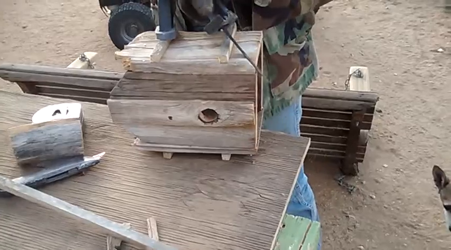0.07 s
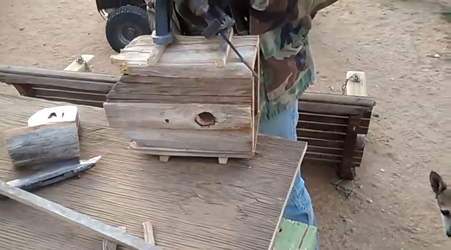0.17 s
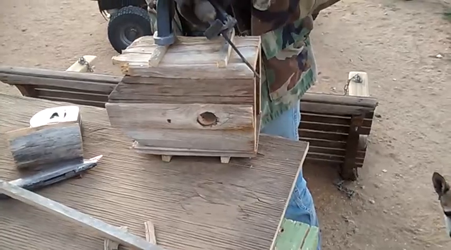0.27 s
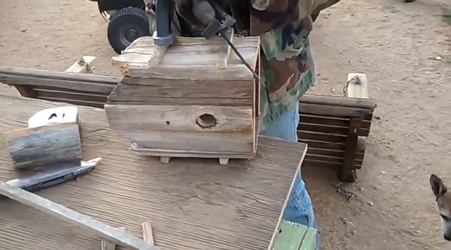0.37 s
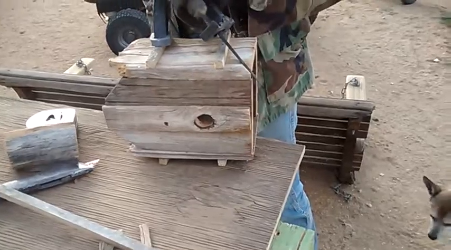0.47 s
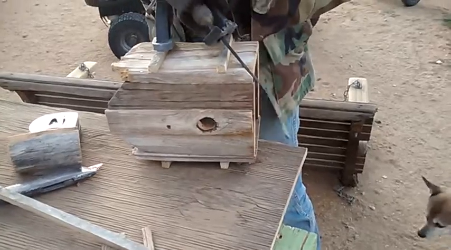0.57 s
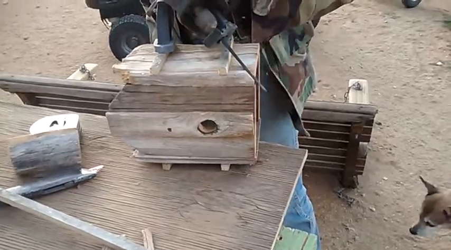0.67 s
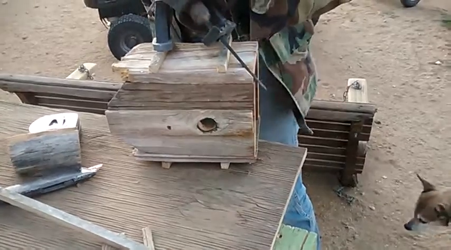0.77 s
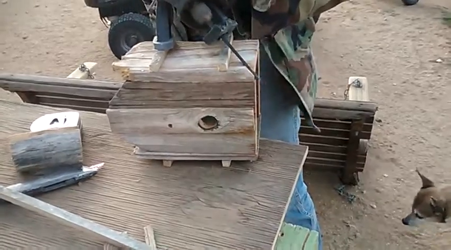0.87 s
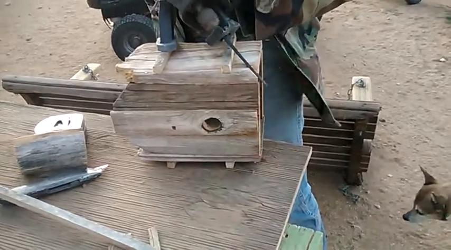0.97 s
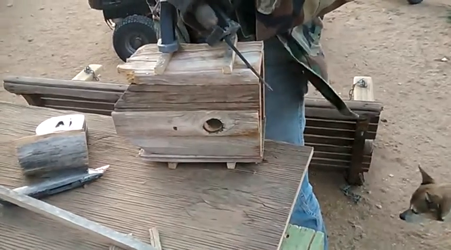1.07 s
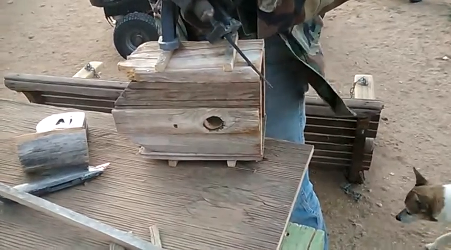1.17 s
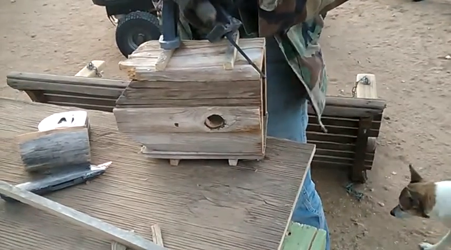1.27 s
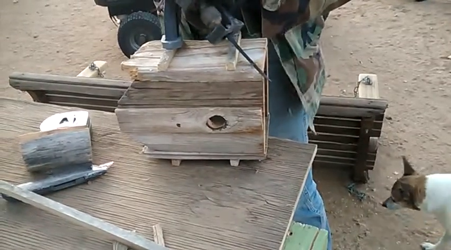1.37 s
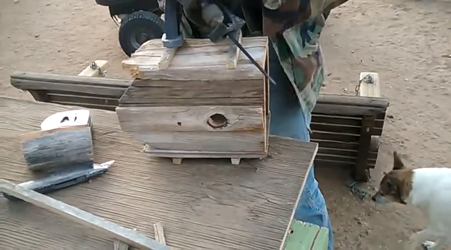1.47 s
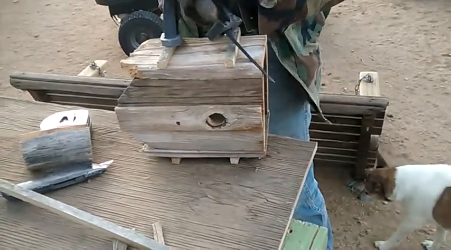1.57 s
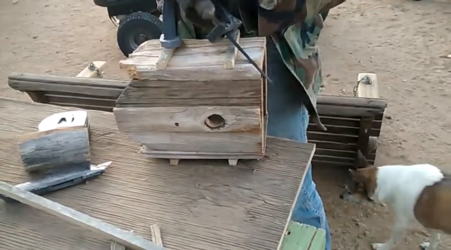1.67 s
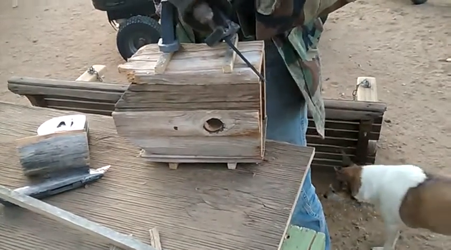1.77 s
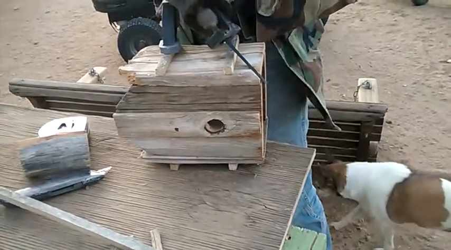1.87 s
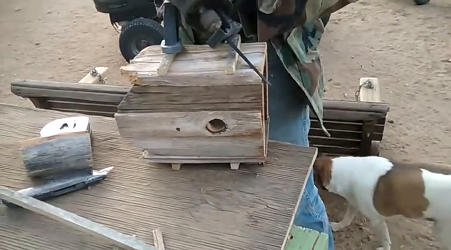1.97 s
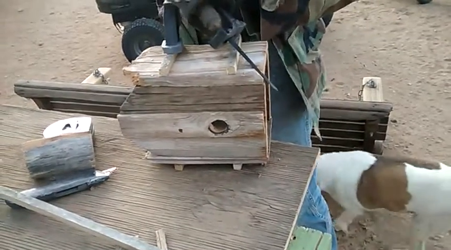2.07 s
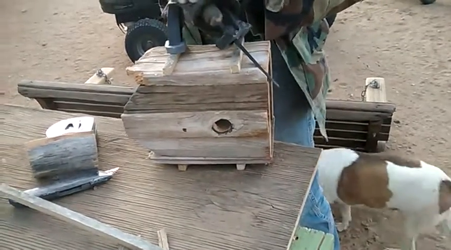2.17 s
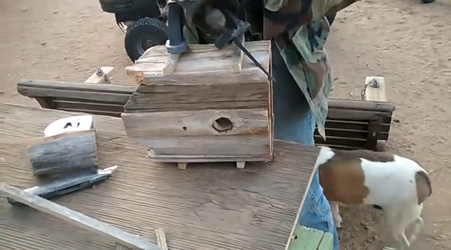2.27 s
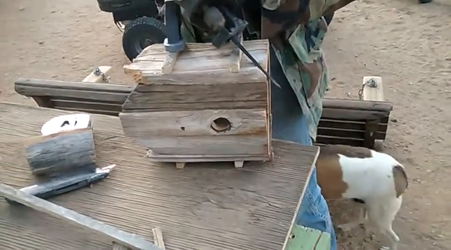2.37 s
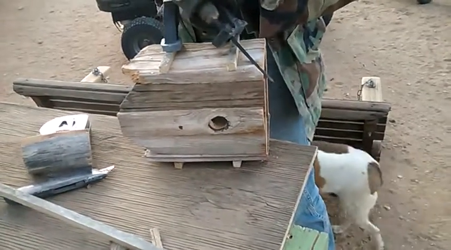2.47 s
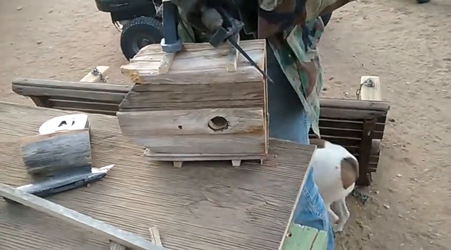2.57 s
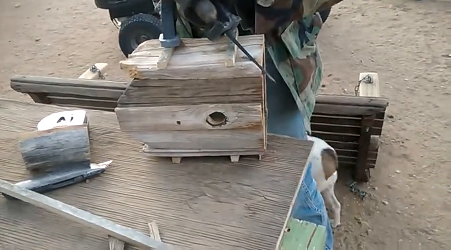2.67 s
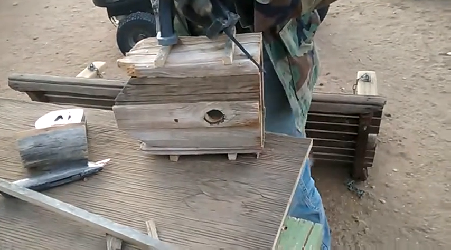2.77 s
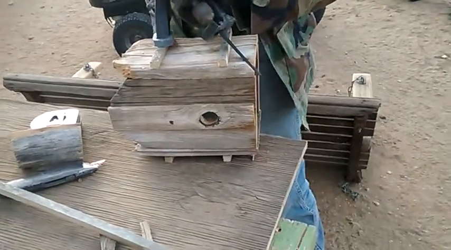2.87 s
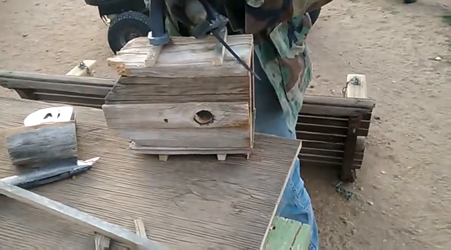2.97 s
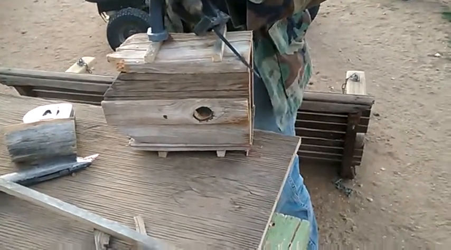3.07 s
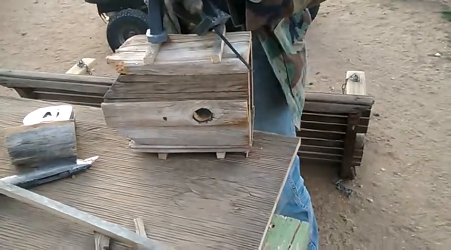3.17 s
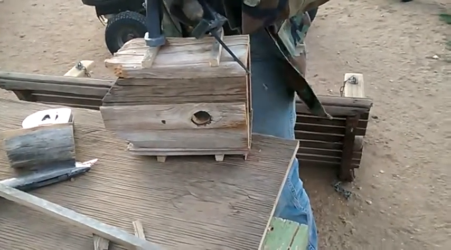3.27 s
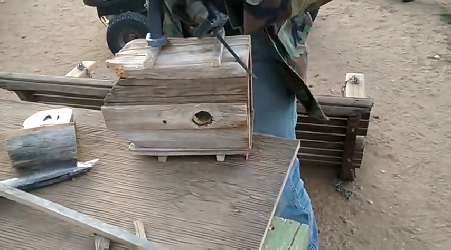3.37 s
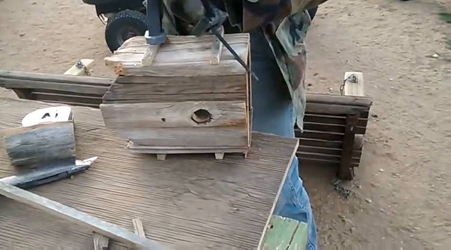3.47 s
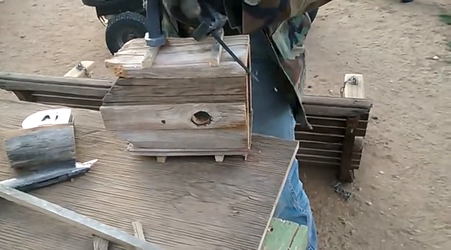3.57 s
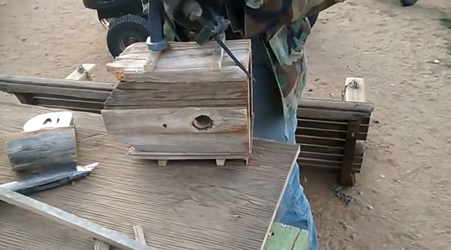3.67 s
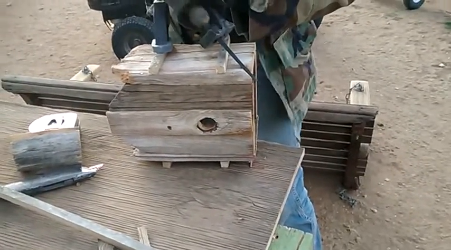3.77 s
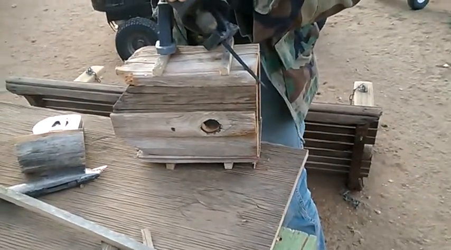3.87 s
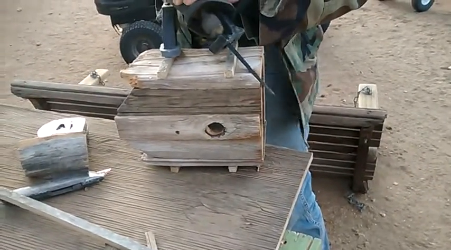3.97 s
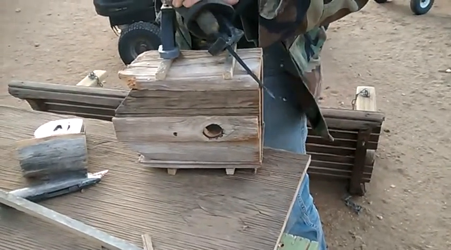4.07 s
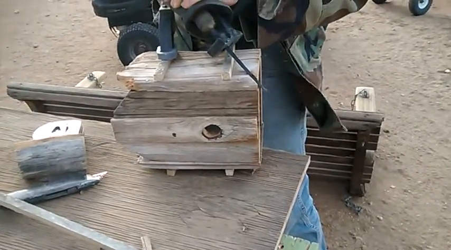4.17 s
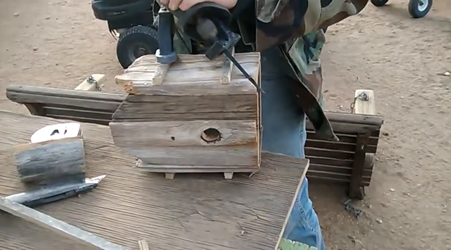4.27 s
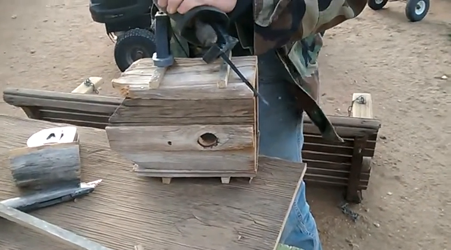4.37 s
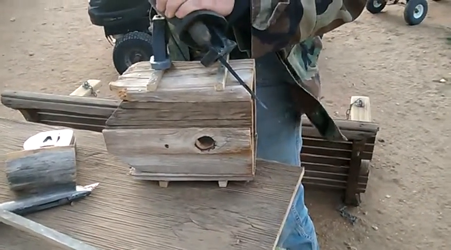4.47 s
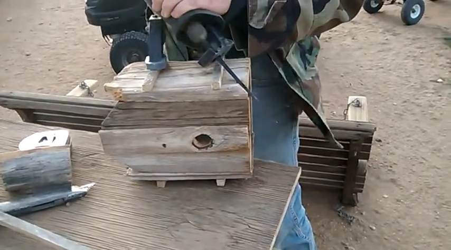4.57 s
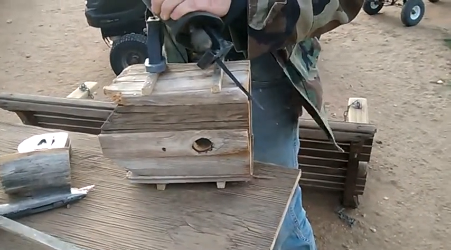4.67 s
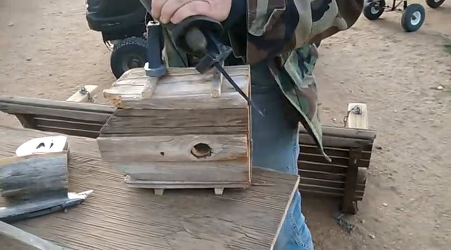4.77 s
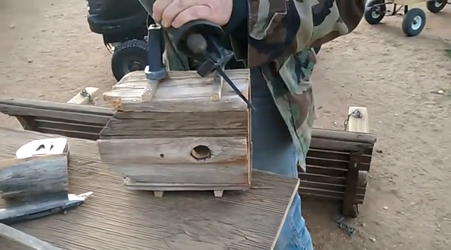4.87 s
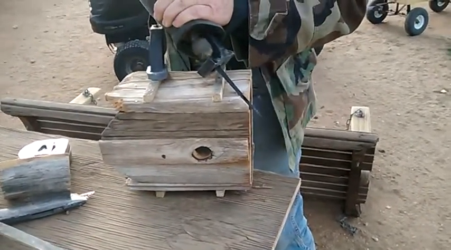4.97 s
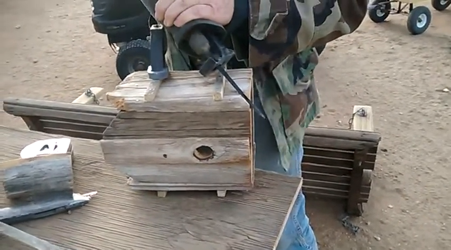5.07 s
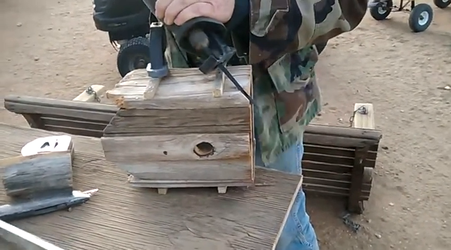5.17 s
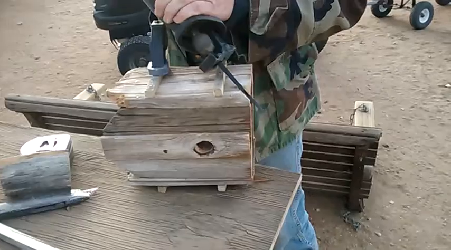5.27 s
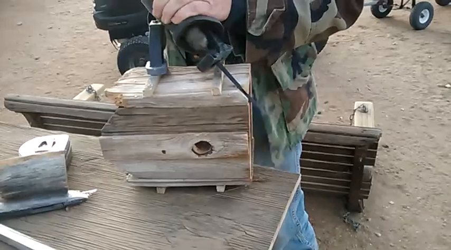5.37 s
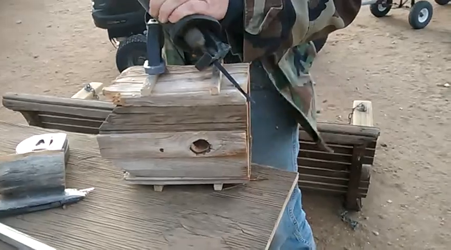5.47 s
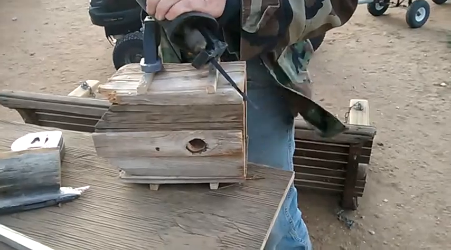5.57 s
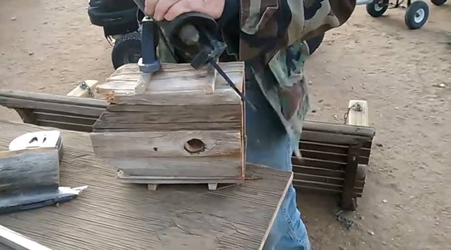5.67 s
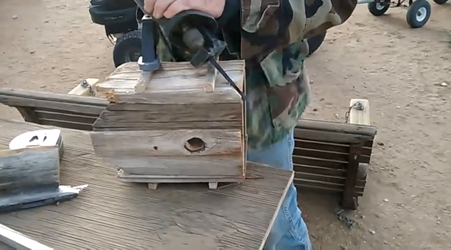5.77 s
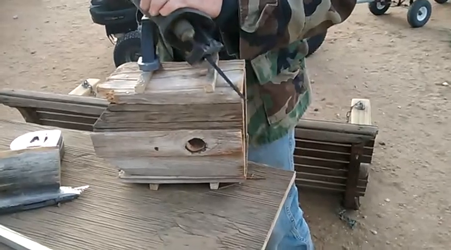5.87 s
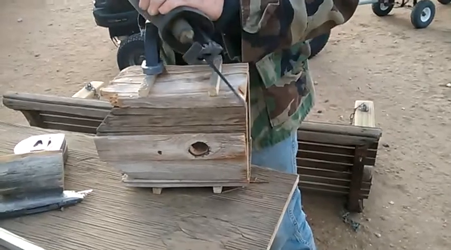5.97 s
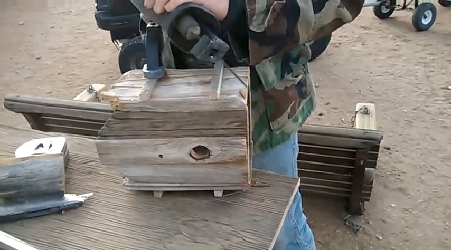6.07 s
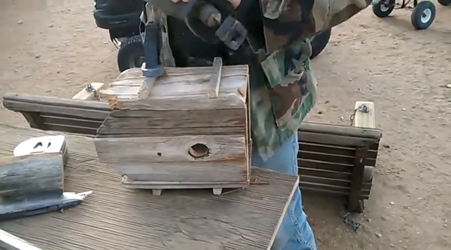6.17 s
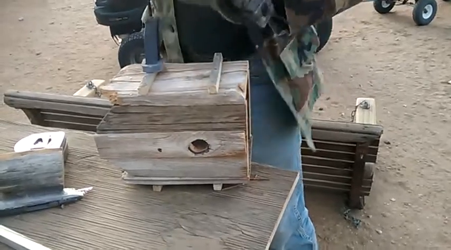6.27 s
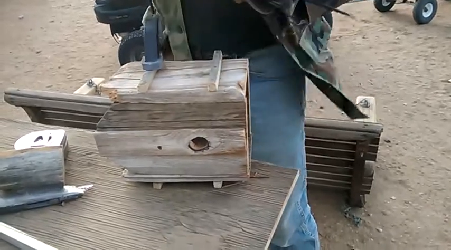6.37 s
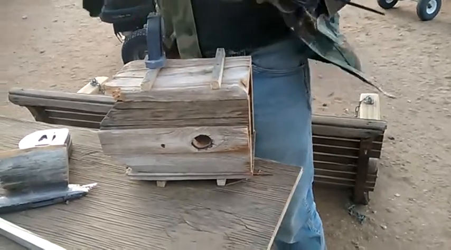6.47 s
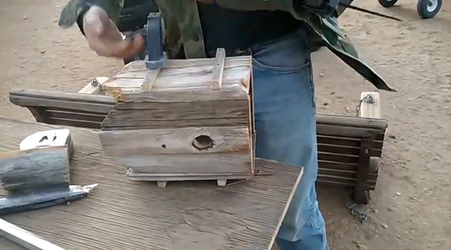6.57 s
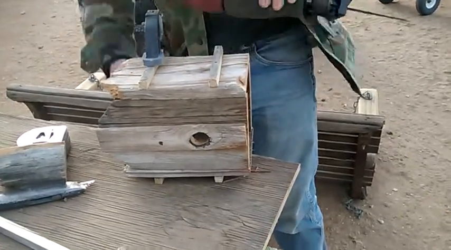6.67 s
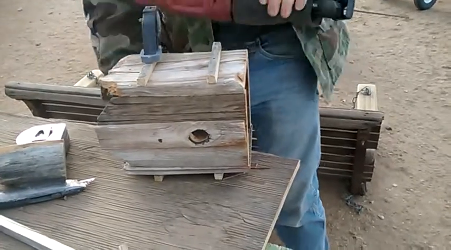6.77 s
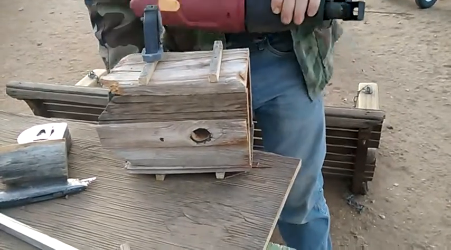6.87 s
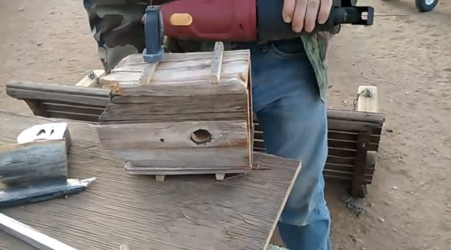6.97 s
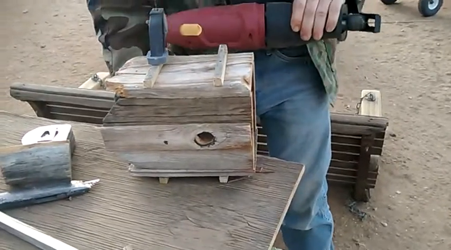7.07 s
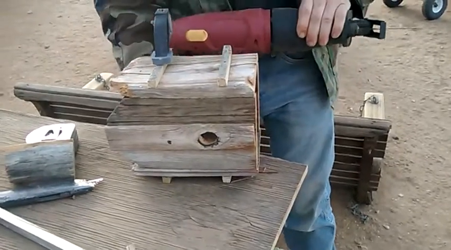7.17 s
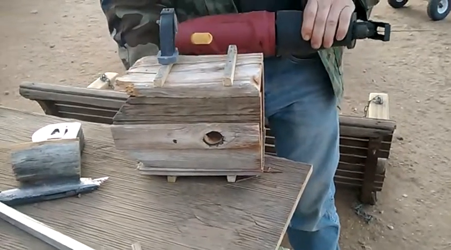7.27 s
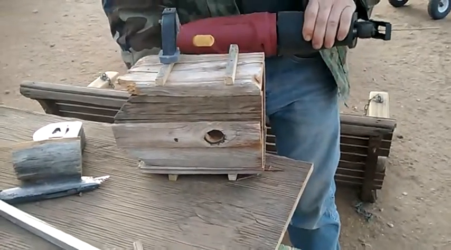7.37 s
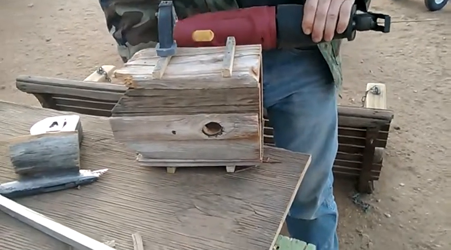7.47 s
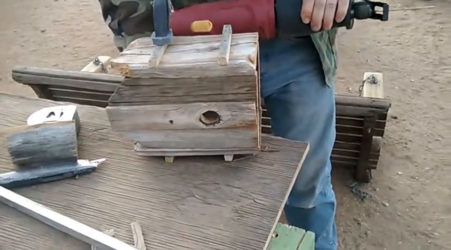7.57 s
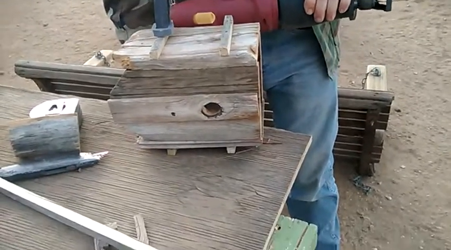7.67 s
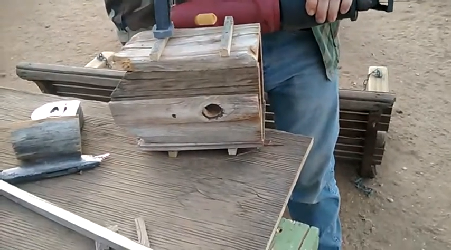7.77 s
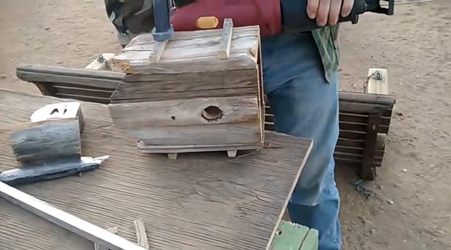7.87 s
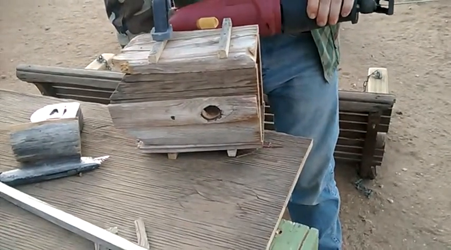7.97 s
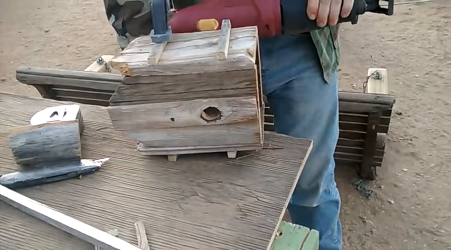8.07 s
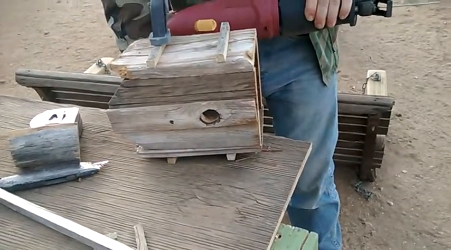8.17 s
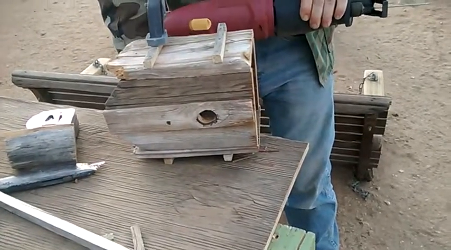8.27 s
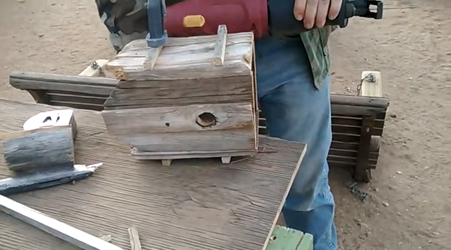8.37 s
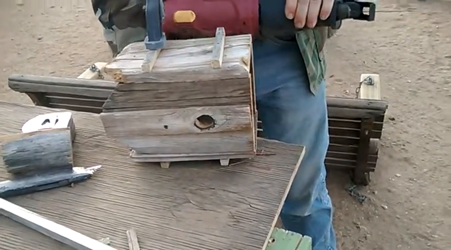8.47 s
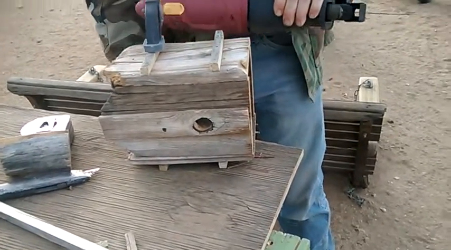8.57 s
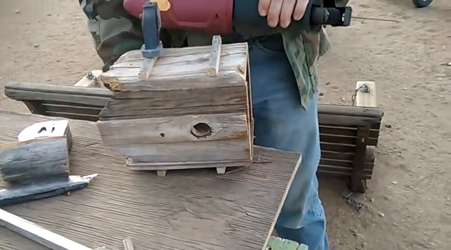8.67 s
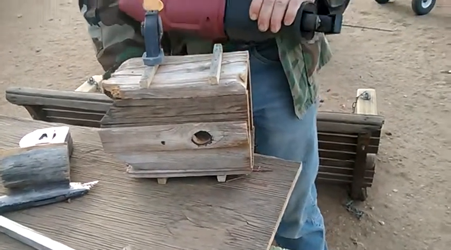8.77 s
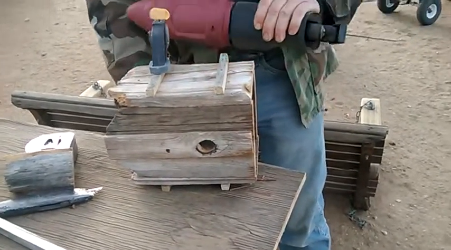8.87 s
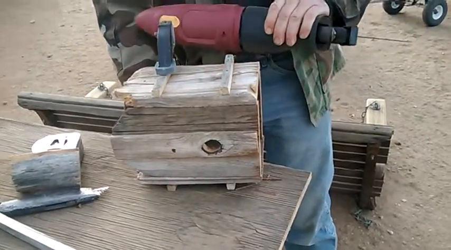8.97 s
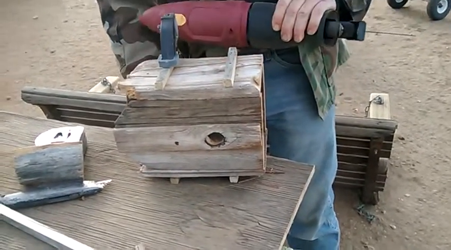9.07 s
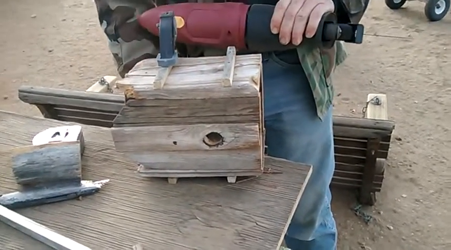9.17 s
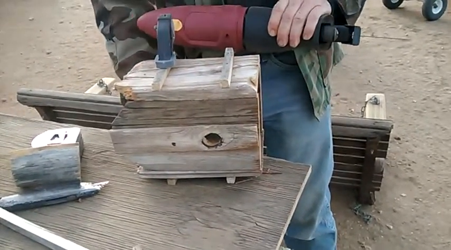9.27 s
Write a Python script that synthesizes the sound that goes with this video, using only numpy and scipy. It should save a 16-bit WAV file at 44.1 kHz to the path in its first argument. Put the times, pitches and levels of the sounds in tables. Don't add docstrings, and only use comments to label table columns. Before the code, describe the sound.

Rapid saw strokes tear old wood with a hollow boom and thin motor whine, then loose gears clatter, slow and fall silent.

```python
import sys
import numpy as np
from scipy import signal
from scipy.fft import rfft, irfft
from scipy.io import wavfile
from scipy.ndimage import uniform_filter1d

SR = 44100
rng = np.random.default_rng(int(sys.argv[2]) if len(sys.argv) > 2 else 0)


def natural_amplitude(level_db):
    exponent = np.asarray(level_db, float) / 20
    return 10 ** exponent


def dump_mix(stems):
    frames = np.atleast_2d(stems).T
    limited = np.clip(frames, -1, 1)
    pcm = np.round(limited * 32767).astype(np.int16)
    wavfile.write(sys.argv[1], SR, pcm)


N = 411012
TIME = np.arange(N) / SR
HZ = np.maximum(np.arange(N // 2 + 1) * SR / N, 1)

# freq_hz, density_db
AIR = [(40, -9), (138, 3), (580, -0.5), (1500, -10), (2700, -20), (4000, -14), (5200, -19.5), (6600, -12.5),
       (15000, -37)]
AIR_DB = -44.5

# time_s, buffeting_db
GUST = [(0.0, -39), (1.0, -30.5), (1.8, -39), (2.35, -24.5), (2.8, -39), (3.4, -42.5), (4.0, -25),
        (4.2, -36), (4.75, -26.5), (5.2, -35.5), (6.0, -30.5), (6.6, -50), (7.0, -44), (7.2, -47),
        (8.2, -62), (8.4, -64), (9.15, -75), (9.32, -42)]
RUMBLE_DB, RUMBLE_FOLLOWS = -43, 0.041
RUMBLE_WANDER_DB = 7.5
# time_s, peak_db, pitch_hz
PUFFS = [(0.782, -8, 237), (0.983, -11, 243), (1.404, -8, 272), (1.477, -5.5, 236), (1.545, -8, 168.6),
         (3.761, -7, 284), (4.558, -9, 216), (5.482, -9, 196.8), (5.633, -14, 304.2), (5.751, -13, 147),
         (6.074, -32, 239), (6.263, -11, 177.5), (6.464, -24, 135), (6.745, -15, 206), (6.771, -6, 187),
         (6.791, -12, 183), (6.845, -11, 185), (6.874, -22, 226), (6.892, -6, 260), (6.911, -7, 217),
         (6.932, -18, 130), (7.019, -10.5, 218.8), (7.042, -16, 200), (7.069, -17, 235),
         (7.421, -21, 159.6), (8.355, -10, 164), (8.398, -18, 176), (8.005, -24, 170), (9.259, -21, 120),
         (9.256, -31, 280), (9.286, -41, 330)]

# freq_hz, phase_rad
LEAD = [(0, 0.12), (1550, 0.23), (1980, -3.2), (3010, -3.1), (3360, -3.9), (3790, -0.5), (4390, -0.3),
        (4910, 2.2), (6890, 5.9), (11100, 15.5), (11700, 15.7), (13300, 19.8), (13900, 22.0), (15000, 22.1)]
# freq_hz, level_db
TILT = [(200, 0.5), (760, 2), (1200, -1), (1850, -12), (2300, -2), (3000, 0.5), (3900, 2.5), (4600, -1),
        (5900, 5.5), (6400, -6), (7300, 4.5), (14800, 3.5)]
# freq_hz, share_0_to_1
SCATTER = [(200, 0.15), (500, 0.0099), (1400, 0.024), (1850, 0.46), (2350, 0.098), (2750, 0.052), (3500, 1),
           (6000, 0.41), (9000, 1), (11400, 0.43), (14000, 0.49)]

# start_s, level_db, pitch_hz
TAPS = [(8.498, -33, 2450), (8.498, -29, 600), (8.525, -29, 1350), (8.527, -38, 3600), (8.548, -35, 1500),
        (8.578, -29, 500), (8.595, -33, 420), (8.62, -42, 750), (8.58, -42, 1400), (8.897, -43, 1900),
        (8.899, -43, 2300), (8.912, -36, 700), (8.93, -38, 260), (8.925, -43, 520), (8.66, -43, 450),
        (9.01, -46, 1600), (9.03, -45, 1600), (9.07, -49, 1620)]
TAP_RING_S, TAP_RING_CYCLES = 0.004, 3
BOUNCE_DB = -18

# time_s, pitch_hz
WHINE = [(0, 8270), (.3, 8210), (.6, 8130), (.9, 8160), (1.25, 8310), (1.58, 8460), (2.05, 8380),
         (2.5, 7990), (3.25, 8370), (3.6, 8430), (3.95, 8410), (4.3, 8250), (4.75, 8070), (5.15, 8130),
         (5.43, 8020), (5.68, 8080), (5.84, 7800)]
WHINE_PER_STROKE = 222
WHINE_DB, WHINE_DB_PER_100_HZ = -30.5, 1
# time_s, strokes_per_s
SLOWING = [(5.93, 32.4), (6.12, 28.8), (6.35, 25.2), (6.6, 21.8), (7.0, 17.5), (7.6, 12.5), (8.6, 4.5)]
# multiple, powered_db, coasting_db, share_in_scattered_path
ROTOR = [(2, -40, -41, 0.97), (3, -60, -35, .9), (4, -34, -36, .9), (5, -49, -49, -.9), (8, -56, -56, -.5),
         (10, -35, -42, -.9), (12, -37, -42, 0.76)]

# time_s, share_out_of_wood_0_to_1, gear_knocks_per_s
COAST = [(5.842, 0.1, 367), (6.35, 0.67, 273), (6.9, 0.97, 134), (7.101, 0.96, 120), (7.501, 0.99, 112),
         (8.2, 1, 144), (8.6, 1, 60)]
# time_s, level_db
COASTING = [(5.8, -23), (6.3, -25.5), (6.75, -23), (6.95, -28.5), (7.65, -27), (8.3, -30.5), (8.5, -35),
            (8.54, -41), (8.6, -62)]
# centre_s, change_db, half_length_s
LULLS = [
    (7.9, -39, 0.01),
    (13, -18, 0.0072),
    (8.1, 4, 0.0076),
    (8.066, -7, 0.009),
    (3.2, -12, 0.0061),
]
# start_s, peak_db
HARD_KNOCKS = [(6.1844, -16), (6.2008, -15), (6.2183, -14), (6.2353, -15), (6.2637, -14), (6.2946, -12),
               (6.3335, -12), (6.3909, -14), (6.4328, -12), (6.4543, -14), (6.4642, -12), (6.4797, -10),
               (6.5076, -10), (6.5166, -11), (6.549, -11), (6.584, -5), (6.6094, -4), (6.6378, -10),
               (6.6458, -9), (6.6772, -10), (6.7012, -11), (6.7147, -12), (6.7271, -10), (6.7431, -8),
               (6.778, -13), (6.7955, -19), (6.8299, -13), (6.8828, -17), (6.9017, -17), (6.9107, -17),
               (6.9401, -23), (6.9611, -18), (6.9716, -16), (7.02, -23), (7.0728, -18), (7.0983, -19),
               (7.1242, -20), (7.1387, -14), (7.1497, -13), (7.1861, -18), (7.209, -18), (7.2185, -18),
               (7.2484, -21), (7.2579, -19), (7.2829, -11), (7.2923, -12), (7.3248, -20), (7.3353, -18),
               (7.3702, -22), (7.3836, -17), (7.4156, -18), (7.4435, -17), (7.4889, -17), (7.4974, -18),
               (7.5128, -19), (7.5313, -20), (7.5463, -17), (7.5762, -19), (7.5852, -16), (7.6031, -16)]
# start_s, peak_db
LAST_KNOCKS = [(7.6338, -26), (7.6338, -25), (7.6673, -26), (7.6807, -24), (7.6922, -17), (7.7162, -25),
               (7.7286, -27), (7.7396, -26), (7.7466, -26), (7.7531, -24), (7.783, -27), (7.7955, -24),
               (7.8074, -25), (7.8329, -26), (7.8553, -27), (7.8643, -26), (7.8783, -26), (7.9007, -27),
               (7.9197, -25), (7.9337, -23), (7.9656, -28), (7.9756, -26), (8.004, -31), (8.004, -26),
               (8.0155, -26), (8.023, -25), (8.0379, -25), (8.0544, -28), (8.0723, -32), (8.0798, -31),
               (8.0853, -28), (8.1063, -25), (8.1138, -28), (8.1377, -27), (8.1532, -27), (8.1621, -29),
               (8.1726, -29), (8.1871, -29), (8.205, -28), (8.2275, -30), (8.2539, -29), (8.2604, -33),
               (8.2909, -31), (8.2973, -30), (8.3143, -31), (8.3213, -30), (8.3542, -33), (8.3697, -33),
               (8.3782, -32), (8.3971, -37), (8.4086, -33), (8.4196, -31), (8.443, -32), (8.4829, -36)]
HARD_DB, LAST_DB = -9, -9
KNOCK_SPREAD_DB, BUNCHING_DB = 2.2, 0.9
KNOCK_OVER_DB = -5
KNOCK_S, CLEAR_S = 0.0005, 0.0083
STRIKE_DB, GRIT_DB, BETWEEN_DB = 12, -2, -17
# centre_hz, width_hz, level_db
GEARBOX = [(1227, 30, -10), (1405, 45, 9), (1673, 110, 3.5), (3400, 177, -2), (3735, 133, -4.5),
           (4240, 84, -29), (4340, 96, -11.5)]
# freq_hz, density_db
RATTLE = [(700, -6), (1200, -0.5), (2100, -7.5), (2800, -16), (4000, -8), (4700, -20), (5300, -16.5),
          (8000, -32.5), (10000, -23), (11500, -82), (15500, -67)]
# time_s, first_hz, second_hz
GAP = [(6.0, 520, 950), (6.9, 420, 880), (7.6, 470, 980), (8.5, 505, 1085)]
LIFT_S, LIFT_HALF_S, LIFT_DB, LIFT_RING_DB = 6.625, 0.27, 6, -24.5

# time_s, boom_db
FEED = [(0.0, -14.5), (0.16, -19), (0.45, -13.5), (0.7, -14.5), (1.3, -15), (1.53, -17.5), (1.77, -15.5),
        (2.15, -12), (2.4, -13), (2.65, -16), (3.12, -18.5), (3.9, -17.5), (4.18, -12), (4.8, -16),
        (5.05, -13.5), (5.5, -13), (5.95, -19.5), (6.15, -44)]
# centre_s, jump_db, half_length_s
BINDS = [
    (0.01, 11, 0.15),
    (0.229, 14.5, 0.089),
    (0.385, 13.5, 0.065),
    (2.005, 4, 0.051),
    (2.483, 3, 0.05),
    (4.623, 11, 0.1),
    (5.238, 12, 0.14),
]
BIND_IN_BOOM, BIND_IN_HOUSING = 0.25, 0.15
# time_s, level_db
TEETH = [(0.0, -27), (0.17, -26), (0.46, -29), (1.31, -25), (1.59, -28), (2.0, -25), (2.19, -30),
         (3.09, -24.5), (3.73, -25), (3.76, -29.5), (4.3, -27), (5.5, -28), (5.71, -24.5), (5.77, -28.5),
         (6.73, -26.5), (6.9, -26)]
HISS_DB, HOUSING_DB = 5.5, -18.5
HOUSING_FOLLOWS_TEETH, HOUSING_FOLLOWS_FEED = 0.88, 0.66
PANEL_DB, PANEL_FOLLOWS = -32, 1.4
# freq_hz, density_db
CUT = [(300, -58), (550, -11.5), (1000, -9.5), (1400, -6.5), (1600, -11.5), (2150, -6), (2650, -7.5),
       (3500, -5), (3900, -10), (4200, -5), (5000, -10.5), (5500, -9), (6500, -8.5), (7150, -10),
       (7500, -14.5), (10000, -16.5), (12000, -28.5), (13500, -31), (15500, -34)]

# centre_hz, width_hz, level_db
BOX = [(467.3, 45.5, -4.5), (488.4, 21.4, 1.5), (541, 117, -7)]
# centre_hz, width_hz, level_db
PANELS = [(623, 63, 2), (666.3, 16.6, 6.5), (705, 49, -1.5), (774, 62, 0), (833.6, 16, 3.5)]
# centre_hz, width_hz, level_db
BLADE = [(1460, 27, 0)]
BLADE_DB, SLAM_DB = -11.5, 24
BLOW_DB, BLOW_IN_PANELS_DB, SLAM_IN_BLADE_DB = 16, -3.5, -2
# start_s, peak_db, pitch_hz
BLOWS = [(0.028, -11, 468), (0.054, -11, 484), (0.075, -9, 479), (0.128, -14, 479), (0.164, -14, 466),
         (0.187, -10, 474), (0.211, -8, 471), (0.274, -13, 498), (0.317, -12, 468), (0.34, -11, 503),
         (0.376, -9, 498), (0.404, -6, 479), (0.43, -8, 468), (0.457, -10, 498), (0.481, -9, 514),
         (0.518, -11, 525), (0.538, -9, 484), (0.615, -14, 466), (0.656, -12, 522), (0.68, -14, 530),
         (0.716, -14, 514), (0.751, -15, 455), (0.781, -12, 530), (0.843, -15, 487), (0.923, -16, 533),
         (0.949, -15, 552), (1.037, -15, 452), (1.08, -14, 484), (1.183, -15, 528), (1.207, -13, 533),
         (1.232, -12, 493), (1.331, -15, 506), (1.374, -16, 525), (1.43, -18, 522), (1.595, -20, 479),
         (1.614, -16, 514), (1.733, -14, 533), (1.779, -10, 493), (1.836, -15, 525), (1.863, -11, 522),
         (1.894, -15, 511), (1.926, -15, 536), (1.95, -14, 495), (1.989, -11, 511), (2.013, -13, 525)]
# start_s, peak_db, pitch_hz
MIDDLE_BLOWS = [(2.057, -12, 514), (2.082, -9, 495), (2.127, -12, 514), (2.169, -10, 525),
                (2.212, -13, 501), (2.24, -13, 538), (2.27, -15, 528), (2.363, -14, 552), (2.386, -12, 474),
                (2.408, -12, 479), (2.433, -10, 501), (2.458, -8, 498), (2.5, -13, 506), (2.523, -12, 525),
                (2.609, -16, 503), (2.692, -18, 525), (2.717, -15, 479), (2.752, -15, 484),
                (2.777, -16, 479), (2.804, -17, 536), (2.934, -17, 506), (2.96, -14, 506),
                (3.014, -17, 522), (3.125, -19, 519), (3.195, -17, 506), (3.262, -13, 509),
                (3.299, -14, 530), (3.348, -17, 458), (3.378, -14, 514), (3.401, -15, 463),
                (3.449, -17, 528), (3.513, -16, 533), (3.615, -14, 525), (3.661, -13, 519),
                (3.747, -14, 452), (3.842, -14, 511), (3.902, -15, 479), (3.928, -13, 487),
                (3.954, -17, 490), (3.976, -15, 509), (4.005, -13, 503), (4.029, -15, 484),
                (4.057, -11, 506), (4.083, -14, 511), (4.109, -11, 501), (4.135, -11, 498)]
# start_s, peak_db, pitch_hz
LATE_BLOWS = [(4.161, -8, 498), (4.187, -9, 493), (4.269, -7, 490), (4.297, -14, 503), (4.321, -10, 503),
              (4.399, -13, 511), (4.428, -16, 503), (4.46, -15, 517), (4.486, -11, 506), (4.539, -11, 476),
              (4.564, -13, 493), (4.592, -13, 479), (4.621, -9, 490), (4.646, -8, 519), (4.685, -13, 479),
              (4.717, -12, 460), (4.737, -12, 514), (4.759, -15, 546), (4.822, -16, 487), (4.849, -17, 541),
              (4.889, -11, 479), (4.927, -12, 514), (4.947, -13, 482), (4.975, -10, 493), (5.003, -10, 498),
              (5.028, -12, 493), (5.056, -11, 495), (5.112, -9, 490), (5.165, -12, 482), (5.194, -10, 487),
              (5.22, -12, 484), (5.241, -9, 455), (5.274, -7, 487), (5.3, -7, 514), (5.355, -8, 493),
              (5.382, -7, 490), (5.411, -11, 471), (5.439, -15, 493), (5.492, -14, 484), (5.522, -13, 479),
              (5.568, -12, 506), (5.622, -15, 509), (5.677, -14, 511), (5.741, -18, 487), (5.776, -18, 493),
              (5.866, -16, 498)]
# start_s, peak_db, pitch_hz
HELD = [
    (0.003, -8, 496),
    (0.225, -15, 490),
    (0.1, -13.5, 474),
    (4.21, -13, 505),
    (4.343, -11, 500),
    (5.326, -11.5, 495),
]
CHATTER_HZ, CHATTER_S = 495, 0.004
CATCH_DB, CATCH_S, CATCH_EARLY_S = 2.5, 0.0079, 0.00192
BETWEEN_CATCHES_DB, DAMPED_DB = -7, -15


def rms_one(x):
    return x / np.sqrt(np.mean(x ** 2) + 1e-20)


def in_time(rows):
    s, *columns = np.transpose(rows)
    return [np.interp(TIME, s, c) for c in columns]


def at_hz(points):
    hz, value = np.transpose(points)
    return np.interp(np.log(HZ), np.log(np.maximum(hz, 1)), value)


def colour(x, points):
    return irfft(rfft(x) * natural_amplitude(at_hz(points)), N)


def band(x, low_hz, high_hz, order=2):
    return signal.sosfilt(signal.butter(order, [low_hz, high_hz], "band", fs=SR, output="sos"), x)


def drift(rate):
    r = np.exp(-80 * np.pi * rate / SR)
    slow = signal.lfilter([1], [1, -2 * r, r * r], rng.standard_normal(N // 40 + 2002))[2000:]
    return np.interp(np.arange(N) / 40, np.arange(len(slow)), rms_one(slow))


def resonate(x, modes):
    out = 0
    for k, (hz, width, db) in enumerate(modes):
        r = np.exp(-np.pi * width / SR)
        poles = [2, -4 * r * np.cos(2 * np.pi * hz / SR), 2 * r * r]
        out = out + (-1) ** k * natural_amplitude(db) * signal.lfilter([1 - r * r, 0, r * r - 1], poles, x)
    return out


def sliding(x, hz, width):
    spin = np.exp(2j * np.pi * np.cumsum(hz) / SR)
    r = np.exp(-np.pi * width / SR)
    return 2 * (signal.lfilter([1 - r], [1, -r], x / spin) * spin).real


def even(x, span=0.306):
    return x / np.sqrt(uniform_filter1d(x ** 2, int(span * SR), axis=-1) + 1e-12)


def halves(x):
    low = irfft(rfft(x) / (1 + (HZ / 2500) ** 6), N)
    return even(low), even(x - low)


def hump(s, half_s):
    return np.exp(-((TIME - s) / half_s) ** 2)


def marks(rows, over_db):
    out, (s, db) = np.zeros(N), np.transpose(rows)
    at = (s * SR).astype(int)
    out[at] = natural_amplitude(db + (over_db + np.zeros(N))[at])
    return out


def clear_of(clicks, span_s):
    return uniform_filter1d(1. * (clicks > 0), int(span_s * SR)) < 1e-9


def outdoor_hush():
    return natural_amplitude(AIR_DB) * rms_one(colour(rng.standard_normal((2, N)), AIR))


def wind():
    buffet_db = in_time(GUST)[0]
    rumble_db = RUMBLE_DB + RUMBLE_FOLLOWS * (buffet_db + 39) + RUMBLE_WANDER_DB * drift(1.4)
    noise = rng.standard_normal((2, 3, N))
    flutter = rms_one(band(band(noise[0], 94, 403), 99, 375))
    buffet = natural_amplitude(buffet_db + 5.2 * drift(23.0)) * flutter
    rumble = natural_amplitude(rumble_db + 3.5 * drift(13)) * rms_one(band(band(noise[1], 18, 39), 11, 55))
    age = np.arange(-1300, 1300) / SR
    for (s, db, hz), (lean, start) in zip(PUFFS, rng.standard_normal((len(PUFFS), 2))):
        near = slice(round(s * SR) - 1300, round(s * SR) + 1300)
        swing = np.cos(2 * np.pi * hz * age + 2 * start) * np.exp(-(age * hz / 0.77) ** 2)
        swing = swing * [[1], [0.77 * np.tanh(lean)], [0.55 * np.tanh(lean)]]
        swing += 0.19 * flutter[:, near] * np.exp(-(age / 0.023) ** 2)
        buffet[:, near] += natural_amplitude(db) * swing
    opposite = (buffet[0] + rumble[0]) * [[1], [-1]]
    return opposite + 0.53 * buffet[1:] + 0.2 * rumble[1:]


def ports(paths):
    shared, scattered = rfft(paths)
    loose = np.clip(at_hz(SCATTER), 0, 1)
    hz, lead = np.transpose(LEAD)
    tilt = natural_amplitude(at_hz(TILT))
    direct = np.sqrt(1 - loose) * shared * np.exp(1j * np.interp(HZ, hz, lead))
    left = (direct + np.sqrt(loose) * scattered) * tilt
    return irfft(np.array([left, shared]) * np.sqrt(2 / (1 + tilt ** 2)), N)


def taps():
    out = np.zeros(N)
    age = np.arange(3000) / SR
    for s, db, hz in TAPS:
        decay = np.exp(-age / (TAP_RING_S + TAP_RING_CYCLES / hz))
        out[int(s * SR):][:3000] += natural_amplitude(db) * np.sin(2 * np.pi * hz * age) * decay
    return out


def strokes():
    powered = [(s, hz / WHINE_PER_STROKE) for s, hz in WHINE]
    s, rate = np.transpose(powered + list(SLOWING))
    return np.cumsum(uniform_filter1d(np.interp(TIME, s, rate), size=3000)) / SR + 0.301


def motor(turn, free):
    rotor = 2 * np.pi * turn * WHINE_PER_STROKE / 24
    powered = TIME < WHINE[-1][0]
    lines = np.zeros((2, N))
    for k, on_db, off_db, share in ROTOR:
        level = natural_amplitude(np.where(powered, on_db, off_db) + 4.0 * drift(2.7))
        lines += level * np.sin(k * rotor) * [[1], [share]]
    freer_db = WHINE_DB_PER_100_HZ * (in_time(WHINE)[0] - 8200) / 100
    whine = natural_amplitude(WHINE_DB + freer_db + 2 * drift(4)) * np.sin(24 * rotor) * powered
    return lines * np.sqrt(1 - free) + whine * [[1], [-0.6]]


def gear_knocks(per_s):
    lull_db = sum(db * hump(s, half_s) for s, db, half_s in LULLS)
    usual = natural_amplitude(np.maximum(in_time(COASTING)[0], -30) + BUNCHING_DB * drift(32.0) + lull_db)
    beat = np.cumsum(per_s * natural_amplitude(0.8 * drift(25))) / SR
    each = natural_amplitude(KNOCK_OVER_DB + KNOCK_SPREAD_DB * rng.standard_normal(N))
    clicks = np.diff(np.floor(beat), prepend=0) * usual * each
    clear = marks(HARD_KNOCKS, HARD_DB) + marks(LAST_KNOCKS, LAST_DB)
    clicks = clicks * clear_of(clear, CLEAR_S) + clear
    fade = np.exp(-1 / (KNOCK_S * SR))
    grit_gain = natural_amplitude(GRIT_DB) * np.sqrt(1 - fade) / 2
    burst = signal.lfilter([grit_gain], [1, -2 * fade, fade ** 2], clicks) + usual * natural_amplitude(BETWEEN_DB)
    return natural_amplitude(STRIKE_DB) * clicks + burst * rng.choice([-1, 1], (2, N))


def gearbox(free, per_s):
    knocks = gear_knocks(per_s)
    first_hz, second_hz = in_time(GAP)
    rattle = resonate(knocks, GEARBOX) + natural_amplitude(-3.5) * colour(knocks, RATTLE)
    rattle += natural_amplitude(5.5) * sliding(knocks, first_hz, width=43)
    rattle += natural_amplitude(3.0) * sliding(knocks, second_hz, width=98)
    housing, hiss = halves(band(rattle, 356, 7100))
    dulling_db = -1.5 - 2 * np.maximum(TIME - 7, 0) - 40 * np.maximum(TIME - 8.42, 0)
    out = np.sqrt(free) * natural_amplitude(in_time(COASTING)[0]) * (housing + natural_amplitude(dulling_db) * hiss)
    return out + natural_amplitude(LIFT_RING_DB) * hump(LIFT_S, LIFT_HALF_S) * even(band(knocks, 1030, 1310))


def effort():
    feed_db, teeth_db = in_time(FEED)[0], in_time(TEETH)[0]
    bind_db = sum(db * hump(s, half_s) for s, db, half_s in BINDS)
    housing_db = HOUSING_DB + HOUSING_FOLLOWS_TEETH * (teeth_db + 29.0)
    housing_db += HOUSING_FOLLOWS_FEED * np.maximum(feed_db + 11.0, -6)
    housing_db += BIND_IN_HOUSING * bind_db + LIFT_DB * hump(LIFT_S, LIFT_HALF_S)
    boom_db = feed_db + BIND_IN_BOOM * bind_db
    panel_db = PANEL_DB + PANEL_FOLLOWS * (feed_db + 18.0) + bind_db
    return housing_db, teeth_db + HISS_DB, boom_db, panel_db


def bite(turn, depth_db, twice_db, uneven_db):
    each = rng.standard_normal(400)
    swing = depth_db * np.cos(2 * np.pi * turn) + twice_db * np.cos(4 * np.pi * turn + 0.96)
    return natural_amplitude(swing + uneven_db * np.interp(turn, np.arange(400), each))


def chatter(clicks):
    age = np.arange(900) / SR
    swell = (age / CHATTER_S + 0.12) * np.exp(1 - age / CHATTER_S)
    skips = np.diff(np.floor(age * CHATTER_HZ), prepend=-1) * swell
    return signal.fftconvolve(clicks, skips)[:N]


def all_blows():
    return list(BLOWS) + list(MIDDLE_BLOWS) + list(LATE_BLOWS)


def catches():
    boom, caught = np.zeros((2, N))
    age = np.arange(1500) / SR
    swell = (age / CATCH_S * np.exp(1 - age / CATCH_S)) ** 2.9
    rows = all_blows() + list(HELD)
    for (s, db, hz), start in zip(rows, rng.random(len(rows))):
        at = max(int((s - CATCH_EARLY_S) * SR), 0)
        boom[at:at + 1500] += natural_amplitude(db + CATCH_DB) * swell * np.sin(2 * np.pi * (hz * age + start))
        caught[at:at + 1500] += swell
    return boom, np.minimum(caught, 1)


def wooden_box(tearing, turn, boom_db, panel_db):
    pull = tearing * bite(turn, depth_db=2.5, twice_db=4.5, uneven_db=0.5)
    slam = natural_amplitude(SLAM_DB + 1.1 * drift(16.0)) * np.diff(np.floor(turn + 0.093), prepend=0)
    blows = marks([row[:2] for row in all_blows()], BLOW_DB - boom_db)
    slam = slam * clear_of(blows, 0.028) + chatter(blows)
    boom, caught = catches()
    steady = even(band(resonate(pull + slam, BOX), 358, 592))
    box = boom + natural_amplitude(boom_db + BETWEEN_CATCHES_DB + DAMPED_DB * caught) * steady
    panels = resonate(pull + natural_amplitude(BLOW_IN_PANELS_DB + 13.5) * blows, PANELS)
    box += natural_amplitude(panel_db) * even(band(panels, 420, 835))
    blade = resonate(pull + natural_amplitude(SLAM_IN_BLADE_DB) * slam, BLADE)
    box += natural_amplitude(panel_db + BLADE_DB) * even(blade)
    thud = np.diff(np.floor(turn + 0.225), prepend=0) * natural_amplitude(4.3 * drift(16.7)) + 0.029 * tearing
    box += natural_amplitude(boom_db - 17.0) * even(band(band(thud, 128, 310), 88.0, 470))
    return box * np.clip((6.35 - TIME) / 0.15, 0, 1)


def teeth(grit_db):
    grit = natural_amplitude(grit_db * np.minimum(rng.exponential(1, N), 6))
    return rng.standard_normal((2, N)) * grit


def cutting(tearing, turn, housing_db, hiss_db):
    stroke_force = bite(turn + 0.43, depth_db=1.0, twice_db=1.0, uneven_db=0.97)
    housing, hiss = halves(colour(tearing * stroke_force, CUT))
    return natural_amplitude(housing_db) * housing + natural_amplitude(hiss_db) * hiss


def saw():
    housing_db, hiss_db, boom_db, panel_db = effort()
    free, per_s = in_time(COAST)
    free = np.clip(free, 0, 1)
    turn = strokes()
    tearing = teeth(grit_db=2) * natural_amplitude(0.88 * drift(82))
    out = np.sqrt(1 - free) * cutting(tearing, turn, housing_db, hiss_db)
    out += gearbox(free, per_s)
    out += wooden_box(tearing, turn, boom_db, panel_db)
    running = np.clip((8.72 - TIME) / 0.05, 0, 1)
    return out * running + motor(turn, free)


def scene():
    tool_heard = TIME < 9.1
    tool = saw() + taps()
    lifted = np.clip(in_time(COAST)[0], 0, 1)
    bounce = natural_amplitude(BOUNCE_DB) * lifted * band(tool, 1100, 3600)
    return (ports(tool) + bounce) * tool_heard + wind() + outdoor_hush()


def top_cut(x):
    return signal.sosfilt(signal.butter(12, 15420, fs=SR, output="sos"), x)


def record(dry):
    mix = 0.99 * np.tanh(dry / 1.422)
    return top_cut(mix)


dry = scene()
out = record(dry)
dump_mix(out)
```